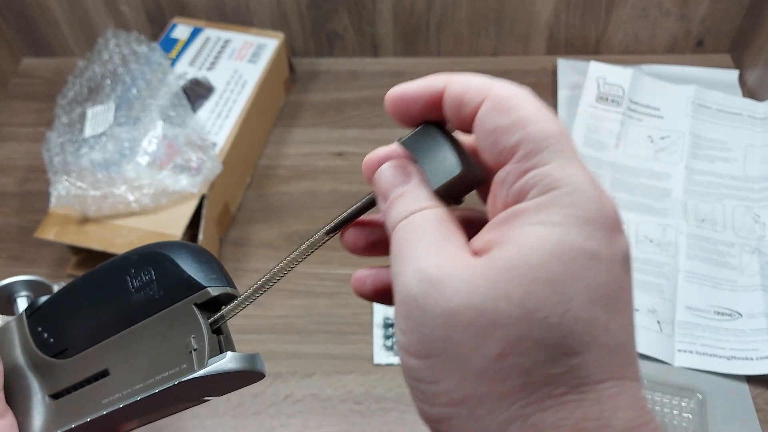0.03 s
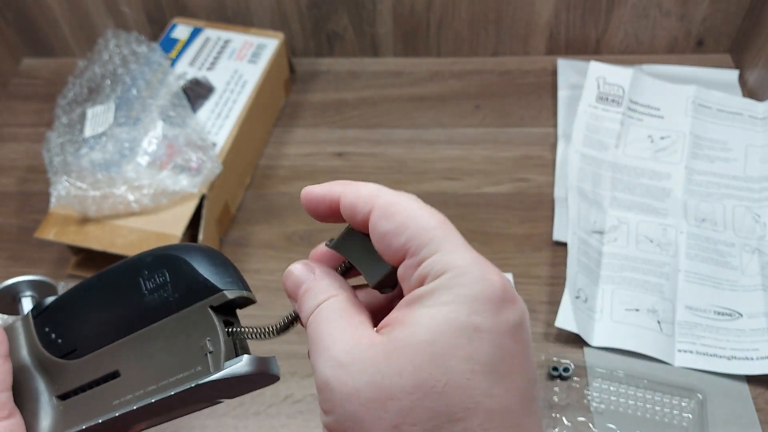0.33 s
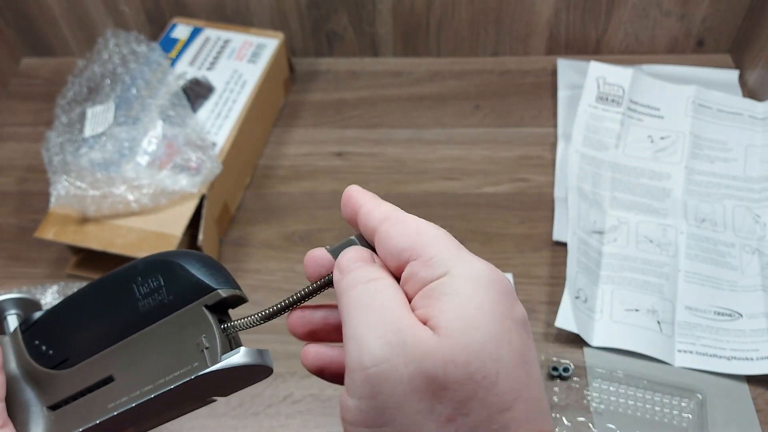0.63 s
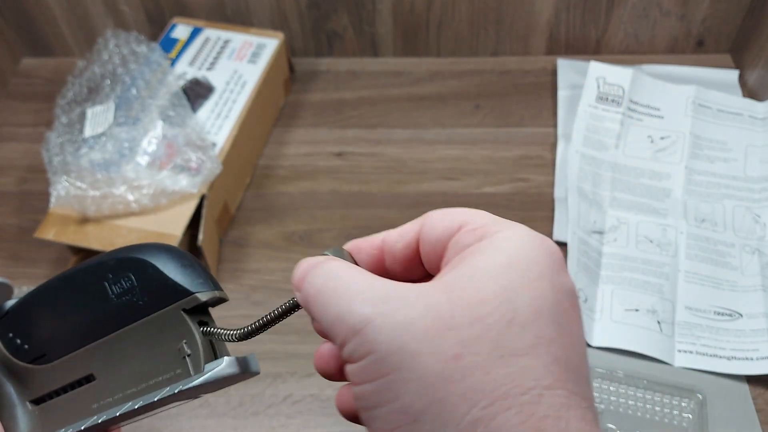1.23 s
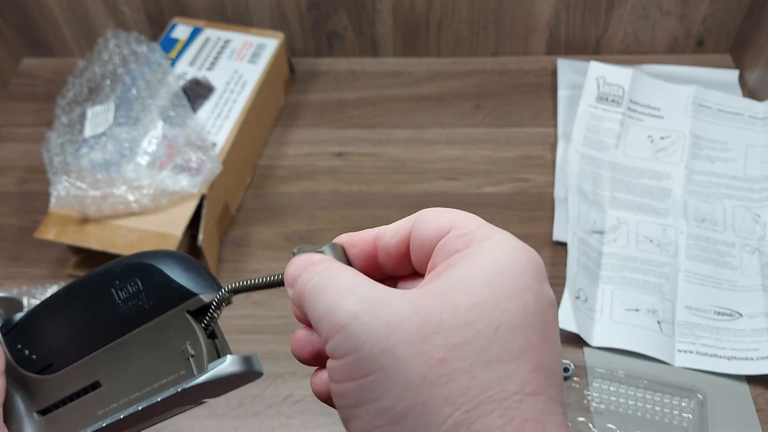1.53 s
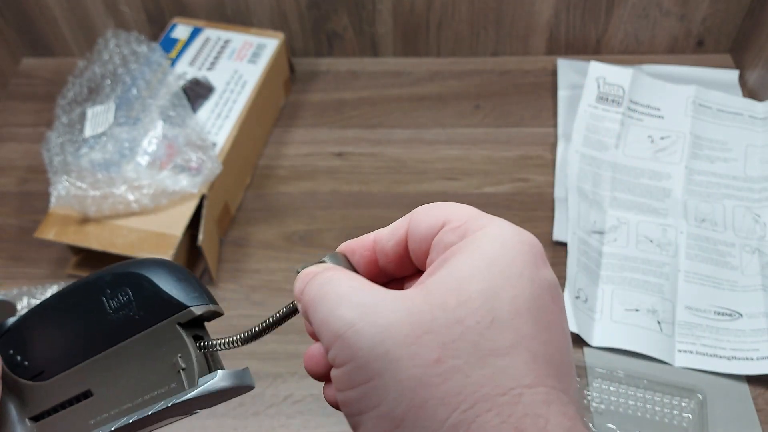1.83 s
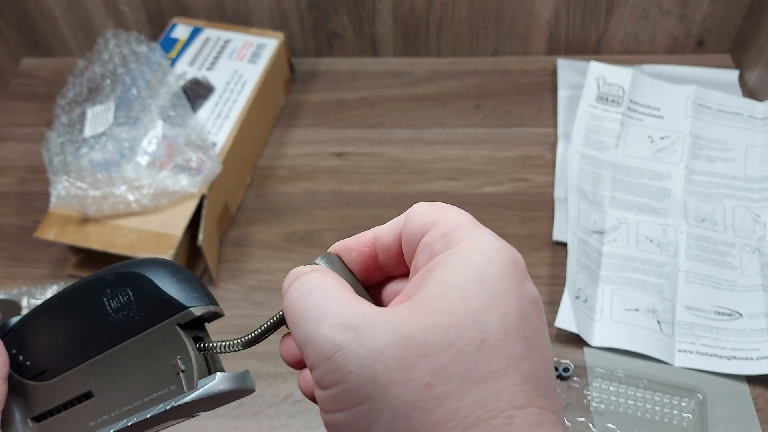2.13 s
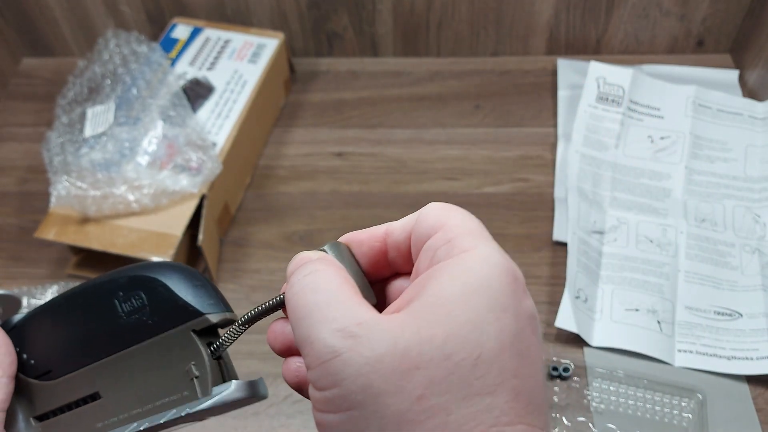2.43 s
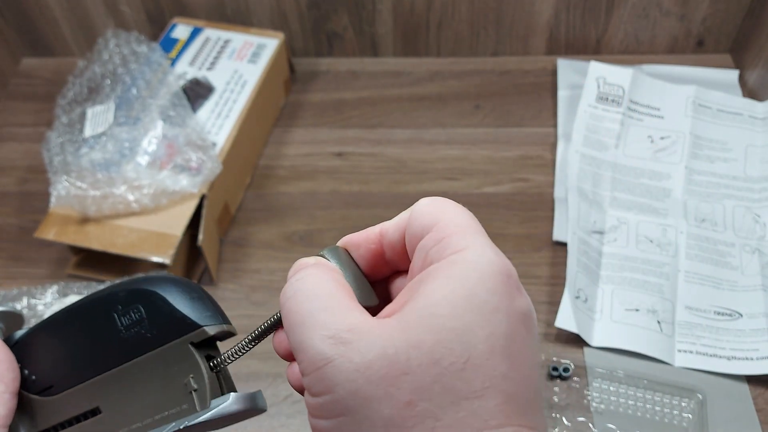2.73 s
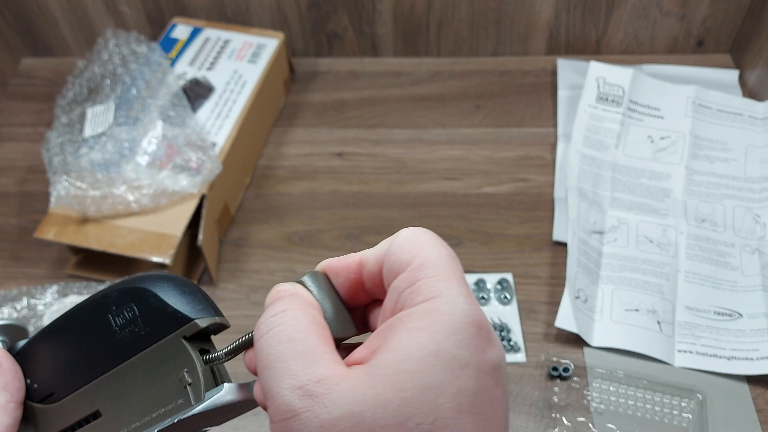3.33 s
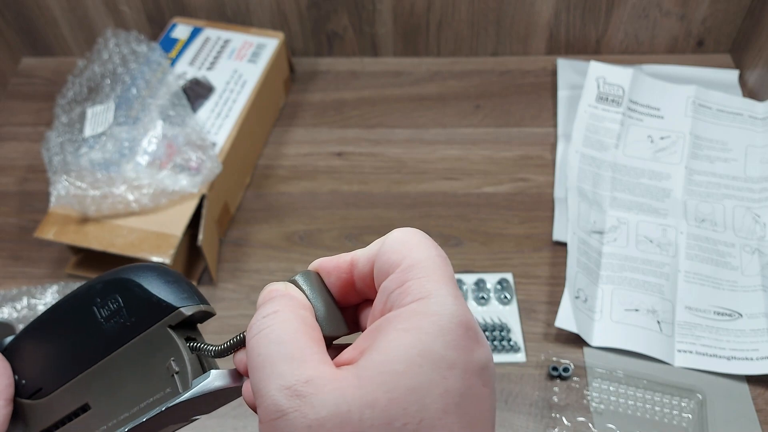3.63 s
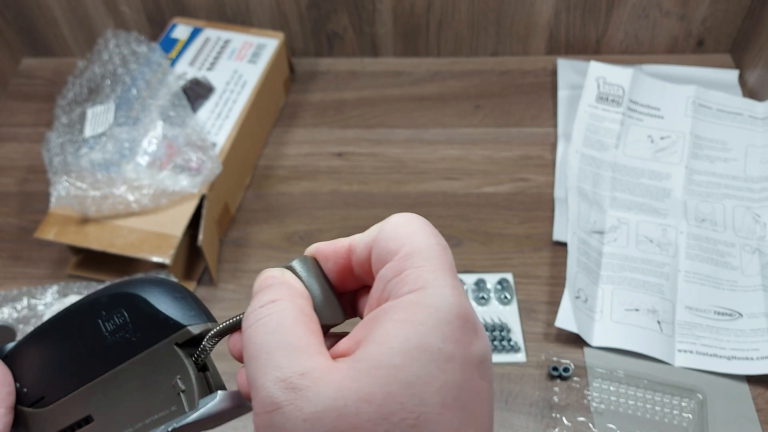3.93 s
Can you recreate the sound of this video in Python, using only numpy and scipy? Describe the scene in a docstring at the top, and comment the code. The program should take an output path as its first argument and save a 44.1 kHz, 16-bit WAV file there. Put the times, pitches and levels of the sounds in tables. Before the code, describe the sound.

A ribbed cord rasps and whirs through a small hand-held tool, ending in a thin squeal. Eased to and fro, it ticks and scrapes lightly, then the plastic housing clicks sharply. Close up in a small, quiet room.

```python
"""A ribbed cord is drawn through the housing of a small hand-held tool, close by, in a small room.
Its ribs strike the opening in a rapid impulse train that excites the plastic: a rasp and a whir, ending
in a thin stick-slip squeal. Eased to and fro, the cord then ticks and scrapes. A few sharp impacts on
the housing close the scene, all over a low room rumble and a faint hum."""
import sys
import numpy as np
from scipy import signal
from scipy.fft import rfft, irfft
from scipy.io import wavfile
from scipy.ndimage import uniform_filter1d

SR = 44100
rng = np.random.default_rng(int(sys.argv[2]) if len(sys.argv) > 2 else 0)


def transcribe(u):
    """Save the signal u as a 16-bit wav file named by the first command-line argument.

    u: samples, shape (n,) or (channels, n), limited to [-1, 1]; the rate is SR.
    q: integer samples, one column per channel.
    """
    v = np.clip(np.atleast_2d(u).T, -1, 1)
    q = np.round(v * 32767).astype(np.int16)
    wavfile.write(sys.argv[1], SR, q)


N = 176400


def amp(db):
    """Decibels to amplitude ratio."""
    return 10 ** (np.asarray(db) / 20)


def unit(x):
    """Normalisation to an rms of one."""
    return x / np.sqrt(np.mean(x ** 2) + 1e-20)


def read(points, hz):
    """Interpolation on a log-frequency axis."""
    f, value = np.transpose(points)
    return np.interp(np.log(hz + 1), np.log(f + 1), value)


def add(mix, s, sound):
    """Superposition: a sound joins the mix at s seconds."""
    part = mix[..., max(round(s * SR), 0):][..., :sound.shape[-1]]
    part += sound[..., :part.shape[-1]]


def arch(length_s):
    """An envelope with a rounded rise and fall."""
    return np.sin(np.linspace(0, np.pi, max(int(length_s * SR), 8))).clip(0) ** 0.18


def wavering_tone(hz, width_hz):
    """Random modulation spreads a carrier into a narrow band."""
    offset = np.fft.fftfreq(len(hz), 1 / SR)
    phases = np.exp(2j * np.pi * rng.random(len(hz)))
    drift = np.fft.ifft(phases / (1 + (2 * offset / width_hz) ** 4))
    return unit((drift * np.exp(2j * np.pi * np.cumsum(hz) / SR)).real)


def bursts(table):
    """Narrow-band noise under rounded envelopes."""
    out = np.zeros(N)
    for s, length, hz, width, db in table:
        shape = arch(length)
        add(out, s, amp(db) * shape * wavering_tone(np.full(len(shape), hz), width))
    return out


# Room noise spectrum. Each row: frequency in Hz, relative density in dB.
NOISE_SPECTRUM = [(30, -25), (52, -1), (86, 1), (115, -9), (160, -7), (210, -16), (290, -9), (370, -11),
                  (520, -18), (750, -27), (3000, -30), (15500, -36)]
# Likeness of left and right. Each row: frequency in Hz, correlation from 0 to 1.
NOISE_CORRELATION = [(60, 1), (900, 0.11)]
# Envelope of the hum. Each row: time in seconds, level in dB.
HUM_ENVELOPE = [(.45, -71), (1.28, -65), (1.45, -85)]


def background(noise_db=-66, hum_hz=281.3):
    """Ambient noise, coherent in its rumble and diffuse in its hiss, with a narrow-band hum."""
    hz = np.fft.rfftfreq(N, 1 / SR)
    left, independent = rfft(rng.standard_normal((2, N)))
    same = read(NOISE_CORRELATION, hz)
    right = same * left + np.sqrt(1 - same ** 2) * independent
    noise = unit(irfft(np.array([left, right]) * amp(read(NOISE_SPECTRUM, hz)), N))
    hum_db = np.interp(np.arange(N) / SR, *np.transpose(HUM_ENVELOPE))
    return amp(noise_db) * noise + amp(hum_db) * wavering_tone(np.full(N, hum_hz), width_hz=53)


def clatter(attack_s=.0016, t60_s=.088, crack_s=.0015, coherent_share=.17, far_ear_s=.00013):
    """Impulse response of the plastic: a crack and dense, damped modes, reaching the left ear first."""
    t = np.arange(SR // 8) / SR
    ring, crack = rng.standard_normal((2, 3, len(t))) * np.minimum(t / attack_s, 1)
    hit = unit(ring * amp(-60 * t / t60_s)) + amp(-2.5) * unit(crack * np.exp(-t / crack_s))
    left, right = np.sqrt(coherent_share) * hit[2] + np.sqrt(1 - coherent_share) * hit[:2]
    return unit(np.array([left, np.roll(right, round(far_ear_s * SR))])) / np.sqrt(len(t))


# Modes of the housing. Each row: frequency in Hz, relative level in dB, 60 dB decay time in seconds.
HOUSING_MODES = [(522, -6, 0.29), (1038, 1, 0.14), (1812, -0.5, 0.1), (1975, 2, 0.066), (2680, -2, 0.078)]


def housing(drive, detune=.025, gain_db=-15):
    """Modal resonance: the housing rings in damped sinusoids, each detuned a little by the grip."""
    t = np.arange(SR // 4) / SR
    ring = np.zeros((2, len(t)))
    for hz, db, t60 in HOUSING_MODES:
        hz *= 1 + detune * rng.uniform(-.96, 1)
        ring += amp(db - 60 * t / t60) * np.sin(2 * np.pi * (hz * t + rng.random((2, 1))))
    return convolve(drive, amp(gain_db) * unit(ring) / np.sqrt(len(t)))


def convolve(x, response):
    """Linear filtering of each channel, cut to the input's length."""
    return signal.fftconvolve(np.atleast_2d(x), np.atleast_2d(response), axes=1)[:, :x.shape[-1]]


# Level difference between the ears. Each row: frequency in Hz, left over right in dB.
LEFT_BIAS = [(400, 2.5), (1300, 1.5), (2400, 3.5), (7500, 8.5), (10000, -1), (14000, 1.5)]


def colour(x, spectrum):
    """Minimum-phase filtering at unit energy, leaning to the left where the tool is held."""
    hz = abs(np.fft.fftfreq(2048, 1 / SR))
    log_gain = np.log(amp(read(spectrum, hz) + np.outer([.5, -.5], read(LEFT_BIAS, hz))))
    response = np.exp(np.conj(signal.hilbert(log_gain)))
    taps = np.fft.ifft(response).real[:, :len(hz) // 2]
    return convolve(x, taps / np.sqrt((taps ** 2).sum(1).mean()))


def brighten(x, db, corner_hz=8000):
    """A shelving filter raises or lowers the treble."""
    hz = np.fft.rfftfreq(x.shape[-1], 1 / SR)
    treble = irfft(rfft(x) / (1 + (corner_hz / (hz + 1)) ** 4), x.shape[-1])
    return x + (amp(db) - 1) * treble


def shifting_grip(x, depth_db, patch_hz=500, patch_s=.05):
    """Spectral modulation: bands swell and fade at random as the cord and the grip move."""
    hz, t, spectra = signal.stft(x, SR, nperseg=256)
    field = rng.standard_normal(spectra.shape[1:])
    for axis, size in enumerate([patch_hz / hz[1], patch_s / t[1]]):
        field = uniform_filter1d(field, round(size), axis)
    gain = unit(amp(depth_db * unit(np.tanh(unit(field)))))
    return signal.istft(spectra * gain, SR, nperseg=256)[1][:, :N]


def impacts(table, gain_db, ring_db, scuff_db, rebound_db, scuff_s=.011, gap_s=.006):
    """Impact with chatter: surfaces slide briefly, catch, then rebound twice, each time weaker."""
    out = np.zeros((2, N))
    ramp = np.linspace(0, 1, round(scuff_s * SR))
    impulse = signal.unit_impulse(SR // 4)
    for s, db, treble_db in table:
        add(out, s - scuff_s, amp(db + gain_db + scuff_db) * ramp * rng.standard_normal((2, len(ramp))))
        gaps = gap_s * (.5 + rng.random(3))
        ring = amp(ring_db - .26 * treble_db)  # duller contacts ring the housing more
        for k, at in enumerate(s + np.cumsum(gaps) - gaps[0]):
            size = amp(db + gain_db + k * rebound_db) * np.sqrt(.0067 * SR)  # energy of a 6.7 ms contact
            add(out, at, size * brighten(clatter(), treble_db))
            add(out, at, size * ring * housing(impulse))
    return out


# Spectrum of the cord's light contacts. Each row: frequency in Hz, relative gain in dB.
CORD_SPECTRUM = [(380, -24), (520, -21), (800, -28.5), (1050, -17), (1350, -14), (1900, -5), (2700, 2.5),
                 (4500, -2.5), (6400, -4.5), (8100, -3), (9200, -9.5), (12500, -6.5), (15500, -21.5)]
# Ribs catching. Each row: start in seconds, relative level in dB, treble gain in dB.
RIB_CATCHES = [(.012, -42.5, -0.5), (.034, -39, -4), (.464, -46.5, -9.5), (.513, -47, -11),
               (.624, -50.5, -14), (.746, -49.5, 5.5), (.831, -43.5, 2.5), (.888, -52.5, -12),
               (1.055, -43, 6), (1.208, -46.5, 7.5), (1.327, -47, 0), (1.389, -43, 6.5),
               (1.468, -44.5, -3.5), (1.531, -42.5, -0.5), (1.720, -49, -2), (1.738, -39.5, 3),
               (1.771, -47, -8), (1.799, -41, -3.5), (1.972, -43.5, 2), (2.081, -51.5, 3),
               (2.099, -40.5, -5), (2.195, -52, -7), (2.326, -49.5, -0.5), (2.459, -48.5, 9),
               (2.545, -47, 3.5), (2.580, -52, -20), (2.645, -52.5, -14), (2.661, -45.5, 0.5),
               (2.711, -59.5, -27), (2.813, -52.5, 0.5)]


def ticks():
    """Impulsive excitation: single ribs catch on the opening."""
    return colour(impacts(RIB_CATCHES, gain_db=3.5, ring_db=3, scuff_db=-19, rebound_db=-8), CORD_SPECTRUM)


def ribs(per_s, jitter=.35, spread_db=4, rub_share=.26, surge_db=1.5, surge_s=.0076):
    """A quasi-periodic impulse train from the passing ribs, over friction noise."""
    wander, size, rub, grip = rng.standard_normal((4, len(per_s)))
    passed = np.cumsum(per_s * np.exp(jitter * unit(uniform_filter1d(wander, 150)))) / SR
    taps = np.diff(np.floor(passed), prepend=0) * amp(spread_db * np.clip(size, -2, 1)) / np.sqrt(per_s)
    surge = amp(surge_db * unit(uniform_filter1d(grip, round(surge_s * SR))))  # the cord grabs and lets go
    return unit((unit(taps) + rub_share * rub) * surge)


# Resonance of the running cord. Each row: time in seconds, centre frequency in Hz.
WHIR_GLIDE = [(.055, 3600), (.16, 2670), (.26, 2160), (.33, 2350)]


def whir(rasp, t, width_hz=890):
    """Forced resonance: the rasp drives a gliding band-pass filter."""
    hz = np.interp(t, *np.transpose(WHIR_GLIDE))
    carrier = np.exp(2j * np.pi * np.cumsum(hz) / SR)
    pole = np.exp(-np.pi * width_hz / SR)
    baseband = signal.lfilter([(1 - pole) ** 2], [1, -2 * pole, pole ** 2], rasp / carrier)
    return 2 * (carrier * baseband).real


# Course of the long pull. Each row: time in seconds, relative level in dB, treble gain in dB.
PULL_ENVELOPE = [(.034, -38, -9), (.058, -36, -5.5), (.071, -42.5, -4.5), (.1, -41.5, -6), (.11, -34, 2),
                 (.13, -38, -2), (.19, -35.5, -5.5), (.228, -44.5, -24), (.262, -39, -7.5),
                 (.312, -28.5, -3.5), (.338, -33, -4), (0.374, -56, -9.5)]


def long_pull(ribs_per_s=380, reference_db=-34.5, doubling_db=14, release_s=.0059):
    """Repeated impacts merge into a rasp: the faster the cord runs, the louder and denser it is."""
    s, db, treble_db = np.transpose(PULL_ENVELOPE)
    t = np.arange(SR // 2 + SR // 4) / SR
    level_db = np.interp(t, s, db)
    gate = (t > s[0]) * np.exp(-np.maximum(t - s[-1], 0) / release_s)
    rate = ribs_per_s * 2 ** ((level_db - reference_db) / doubling_db)
    drive = ribs(rate) * amp(level_db + 3.5) * gate
    rasp = convolve(brighten(drive, np.interp(t, s, treble_db), corner_hz=6550), clatter())
    out = np.zeros((2, N))
    add(out, 0, colour(rasp + amp(-8) * whir(rasp, t) + amp(-1) * housing(drive), CORD_SPECTRUM))
    return out


# Slips of the cord.
# Each row: start in seconds, length in seconds, frequency in Hz, bandwidth in Hz, level in dB.
CORD_SLIPS = [(0.069, 0.14, 5390, 380, -46.5), (.33, .028, 5420, 240, -37), (.377, 0.027, 5350, 200, -45.5),
              (3.03, 0.049, 4990, 930, -63), (3.235, 0.18, 3250, 714, -76),
              (3.358, 0.025, 3880, 493, -54.5), (3.365, 0.042, 5400, 2680, -59)]


def squeals():
    """Stick-slip friction: thin squeals and wider swishes, louder on the left."""
    return bursts(CORD_SLIPS) * amp([[2], [-2]])


def fidget(start_s=.47, end_s=2.8, per_s=70, spread_db=6, level_db=-68.5):
    """A Poisson train of tiny rib impacts while the cord is eased to and fro."""
    t = np.arange(N) / SR
    hits = rng.random(N) < per_s / SR
    sizes = amp(spread_db * np.clip(rng.standard_normal(N), -2, 2))
    return amp(level_db) * unit(hits * sizes) * (t > start_s) * (t < end_s)


# Short slides of the cord. Each row: start in seconds, length in seconds, relative level in dB.
CORD_SLIDES = [(.742, .051, -46.5), (0.789, .04, -42), (1.973, 0.024, -45), (2.555, 0.04, -58),
               (2.672, 0.044, -59.5), (3, .08, -58), (3.31, .12, -64), (3.871, 0.029, -55.5)]


def scrapes(ribs_per_s=220, treble_db=-4):
    """Sliding excitation: slow runs of ribs, among the tiny impacts, set the housing ringing."""
    drive = fidget()
    for s, length, db in CORD_SLIDES:
        shape = arch(length)
        add(drive, s, amp(db) * shape * ribs(np.full(len(shape), ribs_per_s)))
    drive = brighten(drive, treble_db)
    return colour(convolve(drive, clatter()) + 2 * housing(drive), CORD_SPECTRUM)


# Rub of the hand.
# Each row: start in seconds, length in seconds, frequency in Hz, bandwidth in Hz, level in dB.
HAND_RUBS = [(1.96, .32, 340.6, 145, -66.5)]


def hand_rub():
    """Friction of the hand gives a soft, low band of noise."""
    return bursts(HAND_RUBS)


# Spectrum of hard contacts. Each row: frequency in Hz, relative gain in dB.
CLICK_SPECTRUM = [(380, -26), (520, -10), (800, -30), (1050, -13), (1400, -18), (1900, -4.5), (2600, 1),
                  (4500, 0.5), (6400, -4.5), (8000, -2), (9800, -5.5), (12300, -1.5), (15500, -15)]
# Clicks of the housing. Each row: start in seconds, relative level in dB, treble gain in dB.
HOUSING_CLICKS = [(3.714, -41.5, 0), (3.758, -32, 6.5), (3.841, -35, -2), (3.9415, -24.5, 7)]


def clicks():
    """Hard impacts excite the housing over a broad band, with little rebound."""
    hits = impacts(HOUSING_CLICKS, gain_db=1.5, ring_db=0, scuff_db=-24.5, rebound_db=-13)
    return colour(hits, CLICK_SPECTRUM)


# Decay of the room. Each row: frequency in Hz, reverberation time in seconds.
ROOM_DECAY = [(500, 0.25), (4000, 0.23), (12000, 0.15)]


def room(x, build_s=.0043):
    """Reverberation: the diffuse tail of a small room dies faster in the treble."""
    hz, t, spectra = signal.stft(rng.standard_normal((2, SR // 2)), SR, nperseg=256)
    tail = signal.istft(spectra * amp(-60 * t / read(ROOM_DECAY, hz)[:, None]), SR, nperseg=256)[1]
    tail *= np.minimum(np.arange(tail.shape[1]) / SR / build_s, 1)
    return convolve(x, tail / np.linalg.norm(tail[0]))


def scene():
    """Superposition of direct sound, reverberation and ambient noise."""
    rasp = shifting_grip(long_pull(), depth_db=1)
    cord = shifting_grip(ticks() + scrapes(), depth_db=3) + squeals()
    clicking = shifting_grip(clicks(), depth_db=3)
    reverberation = amp(-6.5) * room(amp(-6.5) * rasp + cord + amp(-2.5) * clicking)
    quiet_layer = (background() + hand_rub()) * amp([[1], [-1]])  # leans left
    return rasp + cord + clicking + reverberation + quiet_layer


def record(dry, cutoff_hz=15900):
    """Band limiting: a low-pass filter removes the highest treble."""
    taps = signal.firwin(255, cutoff_hz, window=("kaiser", 8), fs=SR)
    return signal.oaconvolve(dry, taps[None], "same")


dry = scene()
out = record(dry)
transcribe(out)
```